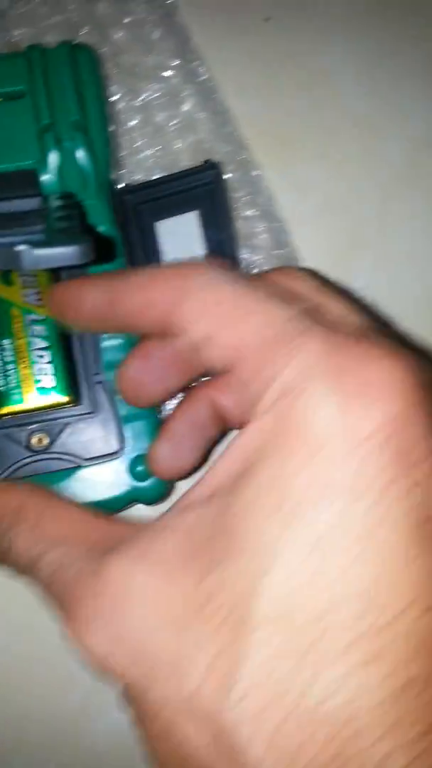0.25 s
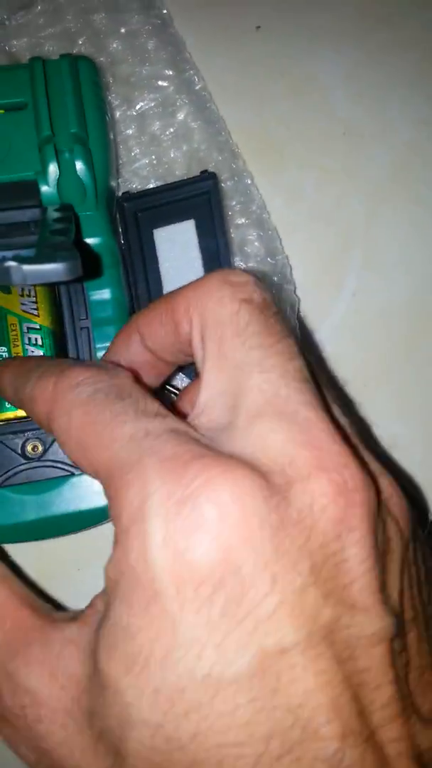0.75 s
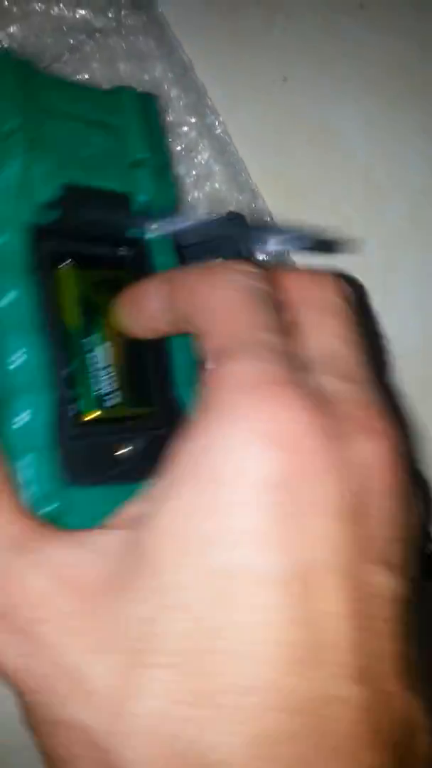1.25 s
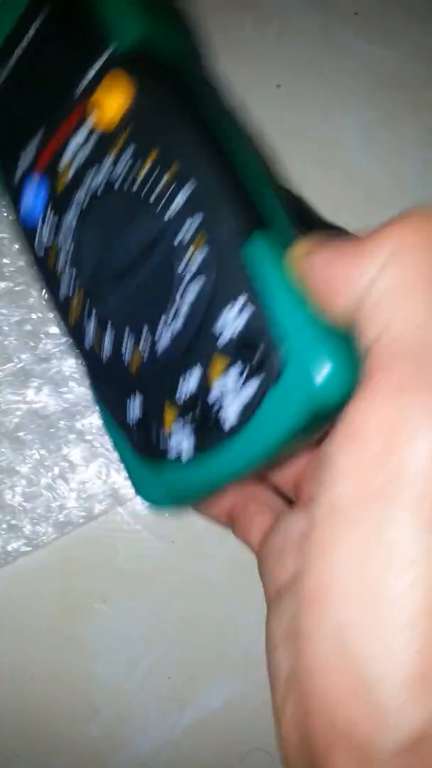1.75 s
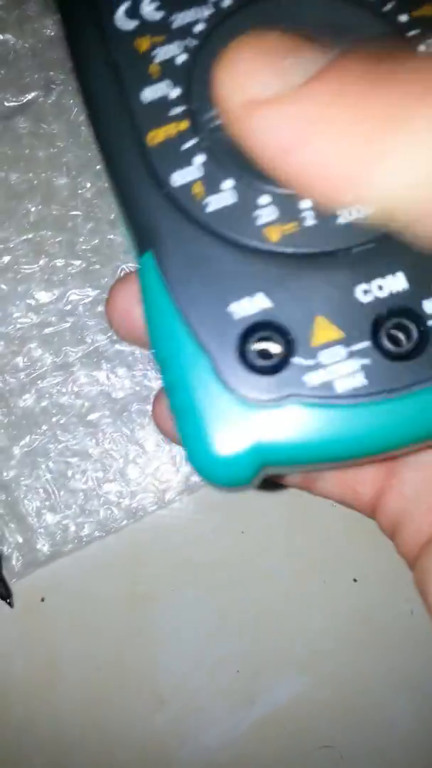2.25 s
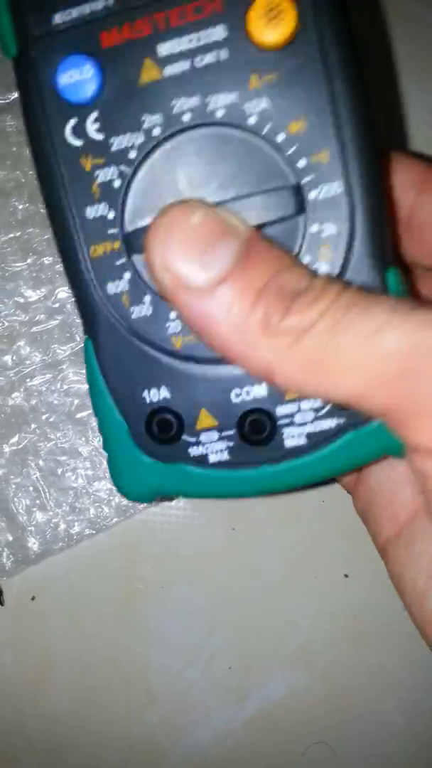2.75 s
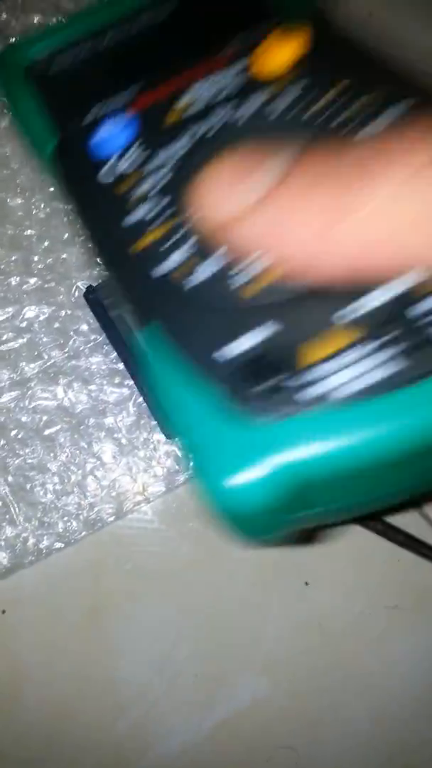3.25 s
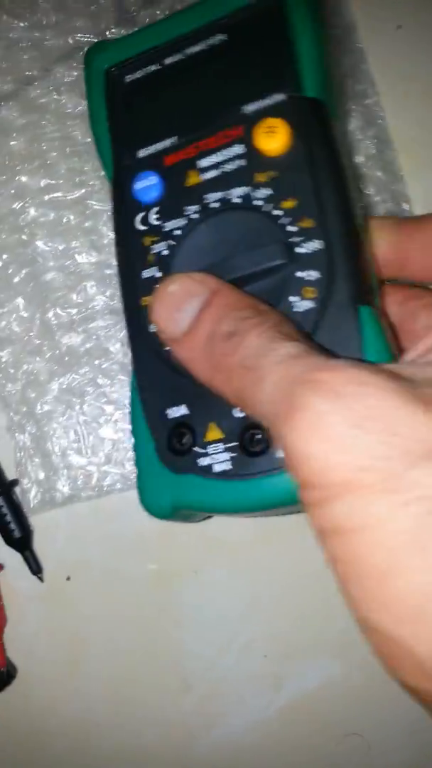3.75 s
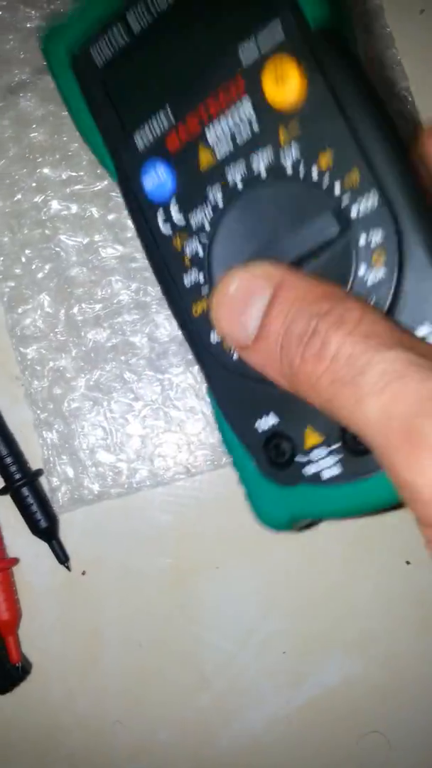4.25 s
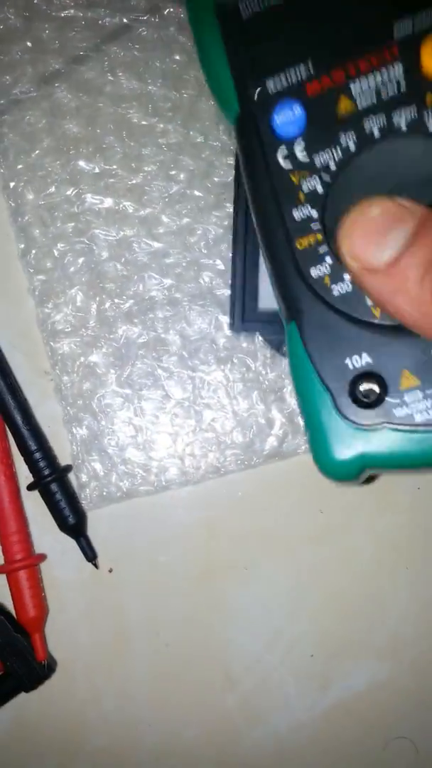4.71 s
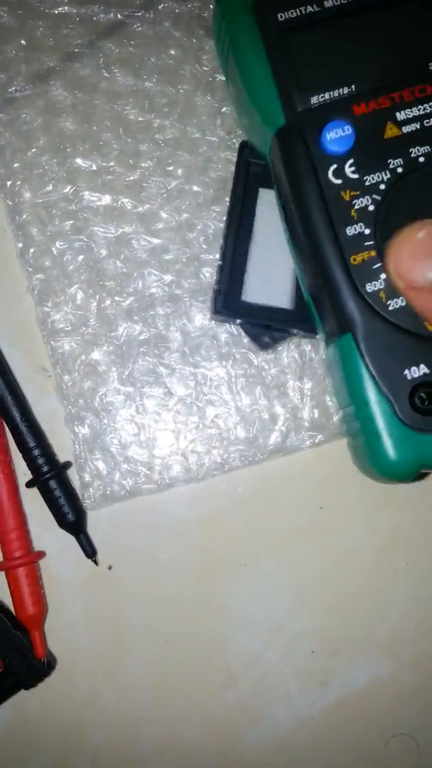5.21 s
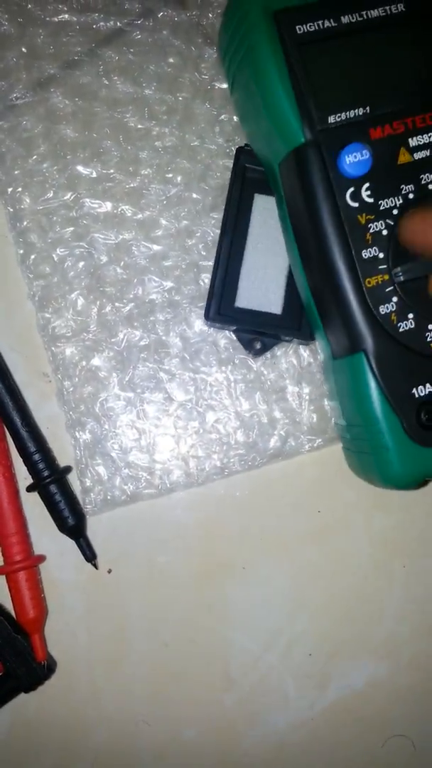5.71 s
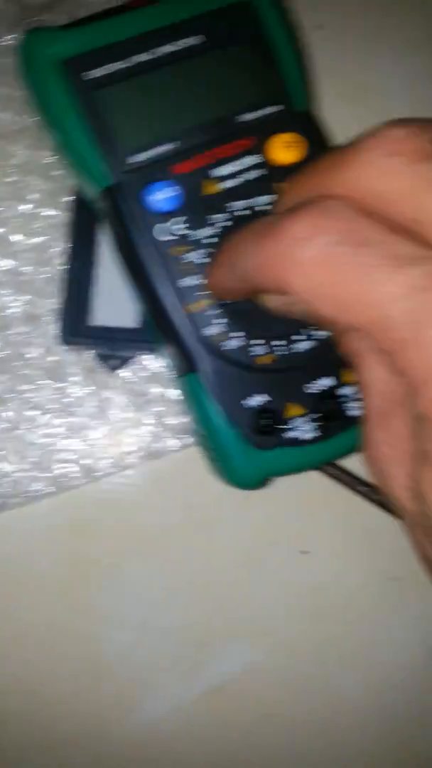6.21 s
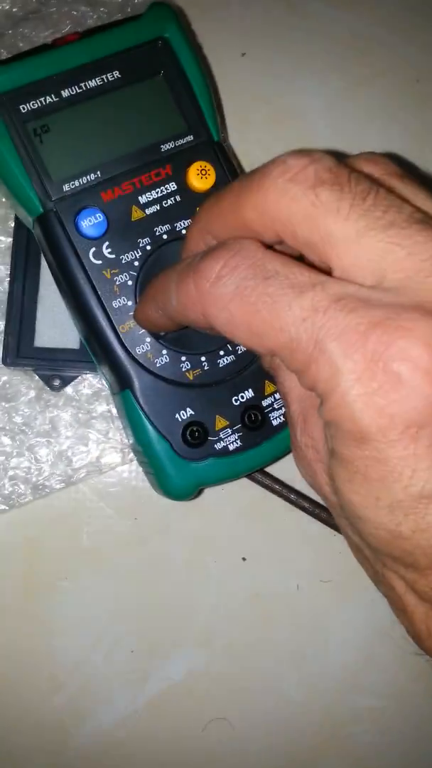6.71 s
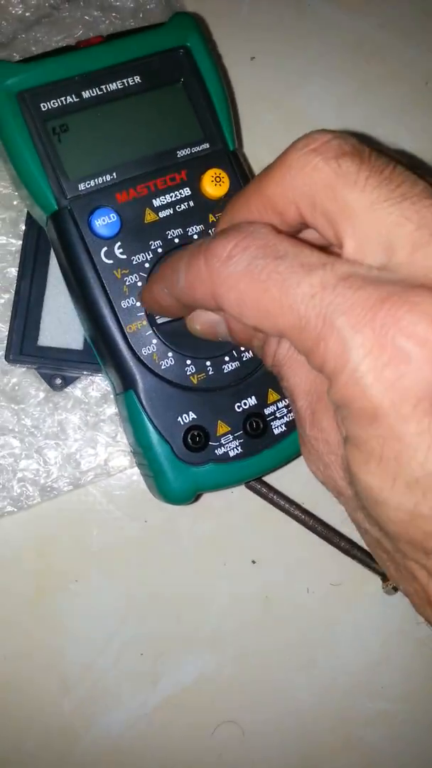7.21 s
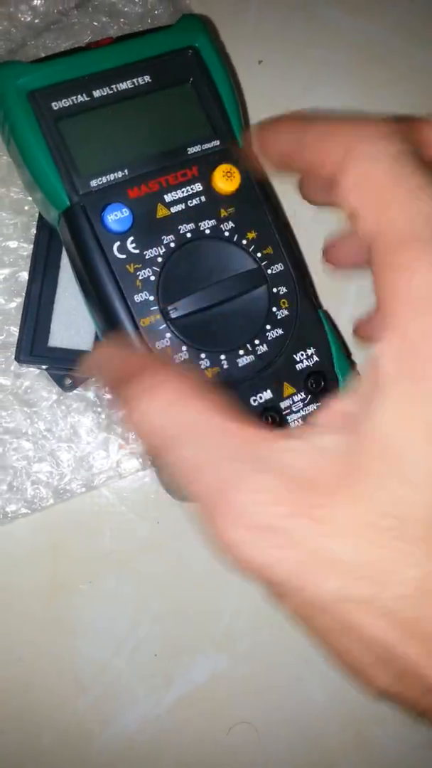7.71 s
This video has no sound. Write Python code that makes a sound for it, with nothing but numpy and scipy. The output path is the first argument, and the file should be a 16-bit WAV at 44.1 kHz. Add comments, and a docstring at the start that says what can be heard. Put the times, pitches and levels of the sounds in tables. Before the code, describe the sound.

Hands fumble a hollow plastic meter over crinkling bubble wrap, with scattered knocks and a dense clatter, then two hard dial clacks, close up indoors.

```python
"""Hands fit a battery into a plastic meter, turn it over on bubble wrap, then click its dial, close to a phone.
First come scattered knocks over film rustle, then a thick run of them: walls crack, the hollow case thuds,
the loose stand rings. As the knocks thin out, creases pop in the film; near the end the dial clacks twice,
each a hard crack with a smooth spray behind it, between the last rustles. Fingers and film are noise in
clumps of tiny snaps; a small hard room answers all but the dial, over hiss that a gate pulls down."""
import sys
import numpy as np
from scipy import signal
from scipy.fft import rfft, irfft, next_fast_len
from scipy.io import wavfile
from scipy.ndimage import uniform_filter1d

SR = 44100
rng = np.random.default_rng(int(sys.argv[2]) if len(sys.argv) > 2 else 0)


def store_wav(level_fs):
    """Save 16-bit WAV to argv[1]."""
    pcm = np.round(np.clip(np.atleast_2d(level_fs), -1, 1) * 32767)
    wavfile.write(sys.argv[1], SR, pcm.T.astype(np.int16))


N = 351036

# Background hiss spectrum: [f/Hz, relative level/dB per Hz]
HISS_SPECTRUM = [(33, -4), (277, -3.5), (1290, -9), (14300, -13.5), (16000, -37.5)]
HISS_DB = -58
# Colour difference of the two microphone ports, shared out between them: [f/Hz, left minus right level/dB]
PORT_COLOUR = [(120, 4.5), (240, -0.5), (480, -0.5), (950, -3), (1890, 4.5), (3770, 8), (7520, -17),
               (15000, 0)]
# Lag of the left port: [f/Hz, lag/s]
LEFT_PORT_LAG = [(1450, 0.00025), (1900, 0.0004917)]
# Room decay: [f/Hz, t60/s]
ROOM_DECAY = [(1500, 0.28), (6000, 0.19), (14000, 0.3)]
EDGE_HZ = 16100  # top of the recorded band

# Resting contact with the film: [t/s, rustle level/dB]
RESTING_CONTACT = [(0.0, -58), (0.4, -70), (0.92, -87), (1.0, -58.5), (2.05, -51), (2.15, -88),
                   (3.6, -70.5), (4.3, -53), (4.5, -108), (4.65, -46), (5.1, -48.5), (5.65, -54.5),
                   (5.85, -57.5), (6.33, -54.5), (6.6, -67.5), (7.0, -67), (7.96, -63)]
# Strokes of hand and case over the film: [t/s of full pressure, rustle level/dB, hold/s]
FILM_STROKES = [(0.957, -52.5, 0.12), (1.195, -47, 0.028), (1.374, -46, 0.0083), (1.493, -43.5, 0.0099),
                (1.619, -34, 0.052), (1.913, -40, 0.01), (2.896, -50, 0.018), (3.674, -41, 0.12),
                (3.914, -42.5, 0.035), (4.203, -43, 0.048), (5.066, -38, 0.0072), (5.515, -38.5, 0.0081),
                (7.663, -43.5, 0.0062), (7.897, -47.5, 0.077)]
PRESS_DB_PER_S, LIFT_DB_PER_S = 327.5, 224
# A knock or pop shakes the film, which then settles; SHAKE_DB is relative to the blow
SHAKE_DB, SETTLE_DB_PER_S, SHAKE_RISE_S = -19, 196, 0.0013
# Film rustle spectrum: [f/Hz, relative level/dB per Hz]
FILM_SPECTRUM = [(530, -64.5), (900, -5), (1750, 9), (2330, 3.5), (3000, 4.5), (6560, 2), (12900, -13.5),
                 (14400, -20), (16000, -60.5)]
# Single creases popping in the film: [t/s, peak level/dB, pitch f/Hz]
CREASE_POPS = [(0.0489, -35.5, 7390), (0.199, -40.5, 5500), (0.5797, -38.5, 4900), (0.769, -37.5, 4270),
               (1.1747, -30.5, 5600), (1.23, -34, 6100), (1.393, -28.5, 5400), (1.686, -18, 5960),
               (1.9366, -25, 5200), (2.065, -33, 2370), (2.17, -35, 5130), (2.4996, -46.5, 4000),
               (2.799, -33.5, 2010), (2.819, -32, 5300), (3.053, -35, 3460), (3.326, -39.5, 3000),
               (4.081, -27, 3000), (4.162, -32, 5230), (4.283, -30, 3700), (4.5425, -40.5, 2340),
               (4.751, -18.5, 5500), (5.394, -26.5, 3000), (5.541, -23.5, 5360), (5.7025, -27, 3680),
               (5.816, -21.5, 4700), (5.901, -29, 4900), (5.9819, -28, 3550), (6.0056, -33, 3980),
               (6.0431, -26.5, 4100), (6.058, -35, 4000), (6.0992, -32, 5760), (6.1732, -27.5, 5030),
               (6.2108, -32, 3080), (6.287, -29, 4700), (6.306, -31.5, 6600), (6.36, -40, 7500),
               (6.4128, -34.5, 2050), (6.44, -26, 3800), (6.6645, -36.5, 6600), (6.927, -37, 6500),
               (7.015, -39, 6300), (7.085, -29.5, 5800), (7.456, -37.5, 3100), (7.693, -32, 3830),
               (7.866, -35.5, 2500)]
POP_T60_S, POP_SPREAD = 0.0062, 1.454  # spread: ratio of each band edge to the pitch

# Dial detent clacks: [t/s, level/dB, treble level/dB above it]
DIAL_CLACKS = [(6.449, -9.5, -8), (7.2848, -5, -17.5)]

# Modes of the air in the case, before extra damping: [f/Hz, level/dB, t60/s]
HOLLOW_MODES = [(542.6, -2.5, 0.23), (649.6, 1.5, 0.075)]
# Modes of the loose stand when free to ring: [f/Hz, level/dB, t60/s]
STAND_MODES = [(1345, 0, .08), (1771, 0, .13), (2207, -1, .07), (2420, -3, .05), (3760, 0, .04)]
# How freely case and stand ring: [t/s, freedom 0-1]
FREEDOM = [(1.5, .05), (1.58, .9), (2.05, .5), (2.1, .05), (2.6, .05), (2.66, .7), (3.9, .6), (3.98, .95),
           (4.35, .95), (4.6, .7), (5.6, .65), (5.7, .05)]
OVERTONE = 2.8  # a struck bar also rings at this multiple of its pitch
# Knocks and snaps: [t/s, wall level/dB, hollow thud trim/dB and bright snap trim/dB over the wall, wall f/Hz]
BLOWS = [(0.075, -35.5, -19, 10.5, 3420), (0.4756, -29.5, 3.5, 1, 3100), (0.968, -45.5, 0.5, 9, 1200),
         (1.0759, -34, -13.5, -10, 3330), (1.5865, -26, -13.5, -19, 3840), (2.281, -39, -5.5, 0.5, 3900),
         (2.578, -40.5, -4, 2, 2930), (2.6677, -24.5, -18, -17.5, 2300), (2.7452, -29, -17, -27.5, 2400),
         (2.901, -35, -9, -28, 1370), (2.9349, -21, -25, -3, 1980), (2.9495, -24.5, -23.5, -7, 1800),
         (3.3921, -19.5, -17, 1, 2250), (3.409, -17.5, -12, -2.5, 2180), (3.4421, -15.5, -22, -8.5, 2600),
         (3.5228, -23.5, -15, -13.5, 2400), (3.743, -30.5, -17.5, -32, 3830), (3.8338, -34, -6.5, -8, 2420),
         (3.9928, -32, -16, -28, 1350), (4.0602, -32, -11, -16, 2700), (4.086, -40.5, -1.5, -4, 2430),
         (4.2228, -36, -7, -27, 1330), (4.301, -22, -14.5, -15, 1870), (4.4031, -42.5, -16.5, 10, 3380),
         (4.631, -19, -45.5, -6, 1900), (4.672, -15, -48, -5, 2020), (4.681, -17, -45, -1, 2140),
         (4.6918, -40, -11.5, 22, 2660), (4.7281, -19.5, -41, -0.5, 2300), (4.732, -25.5, -45.5, 2.5, 3900),
         (4.779, -31, -6.5, -16.5, 2270), (4.803, -17, -16, -6, 3410), (4.8112, -21.5, -2.5, -0.5, 3900),
         (5.142, -39.5, 8.5, 5, 2180), (5.233, -21, -24, -12.5, 1800), (5.246, -23, -19, -5, 2100),
         (5.27, -24, -11.5, -13, 1350), (5.295, -22, -12, -6, 2400), (5.3724, -24, -14, -16.5, 2070),
         (5.4145, -27.5, -8.5, -7.5, 3570), (5.448, -33, -1.5, 1, 2600), (5.5039, -33, -3, -4, 4080),
         (5.6148, -47, 5, -4, 1360), (6.823, -41.5, -3.5, -10, 1956), (7.2146, -30, -22.5, -9, 2420),
         (7.27, -45, 1.5, -20.5, 2280)]


def gain_of(db):
    """Turns decibels into an amplitude factor."""
    return 10 ** (np.asarray(db) / 20)


def evened(x):
    """Brings a signal to an RMS of 1."""
    return x / np.sqrt(np.mean(x ** 2) + 1e-20)


def read(points, hz):
    """Reads a frequency curve, straight between its points on a log scale."""
    f, value = np.transpose(points)
    return np.interp(np.log(hz + 1), np.log(f + 1), value)


def bandpassed(x, lo_hz, hi_hz):
    """Keeps one band of a signal, with gentle slopes."""
    return signal.sosfilt(signal.butter(2, [lo_hz, hi_hz], "bandpass", fs=SR, output="sos"), x)


def coloured(x, points, share=1, lag=((1, 0),)):
    """Filters by a share of a dB spectrum, with an optional delay for each frequency."""
    size = next_fast_len(N + 4096)
    hz = np.fft.rfftfreq(size, 1 / SR)
    turn = np.exp(-2j * np.pi * hz * read(lag, hz))
    return irfft(rfft(x, size) * gain_of(share * read(points, hz)) * turn, size)[..., :N]


def seeds_for(events):
    """Draws one seed per event, so each has its own chance variation."""
    return rng.integers(0, 2 ** 31, (len(events), 1))


def ring(modes, t, luck, detune):
    """Damped modes of one blow, each with chance strength and a little chance in pitch; peak 1."""
    hz, db, t60 = np.transpose(modes)[:, :, None]
    strength, pitch = luck.standard_normal((2, len(modes), 1))
    decay = gain_of(db + 3 * strength - 60 * t / t60)
    tones = decay * np.sin(2 * np.pi * hz * (1 + detune * pitch) * t)
    mix = tones.sum(0)
    return mix / abs(mix).max()


def crack(lo_hz, hi_hz, t60, t, luck):
    """Too many damped modes to count: a click and short burst in one band, with one weaker bounce; peak 1."""
    bounce = t - luck.uniform(.0015, .004)
    shape = gain_of(-60 * t / t60)
    shape = shape + luck.uniform(0, 0.6) * gain_of(-60 * abs(bounce) / t60) * (bounce > 0)
    click = 4 * (t == 0)
    burst = bandpassed(luck.standard_normal(len(t)) * shape + click, lo_hz, hi_hz)
    return burst / abs(burst).max()


def room(x):
    """Sparse reflections of random sign, each band dying at its own speed, other taps at each port."""
    taps = np.zeros((2, SR // 2))
    # one tap at a chance spot in every 20 samples
    at = np.arange(120, SR // 2 - 20, 20) + rng.integers(0, 20, (2, (SR // 2 - 121) // 20))
    np.put_along_axis(taps, at, rng.choice([-1., 1.], at.shape), 1)
    hz, t, bands = signal.stft(taps, SR, nperseg=256)
    decay = gain_of(-60 * t / read(ROOM_DECAY, hz)[:, None])
    tail = signal.istft(bands * decay, SR, nperseg=256)[1]
    # thuds stay in hand and table
    x = signal.sosfilt(signal.butter(2, 900, "highpass", fs=SR, output="sos"), x)
    return signal.fftconvolve(x[None], tail / np.linalg.norm(tail[0]), axes=1)[:, :N]


def rustle_level(t):
    """Power sum of resting contact, strokes that press, hold and lift, and the shake after each knock or pop."""
    power = gain_of(np.interp(t, *np.transpose(RESTING_CONTACT))) ** 2
    for s, db, hold in FILM_STROKES:
        press = PRESS_DB_PER_S * np.maximum(s - t, 0)
        lift = LIFT_DB_PER_S * np.maximum(t - s - hold, 0)
        power += gain_of(db - press - lift) ** 2
    for s, blow_db, *_ in BLOWS + CREASE_POPS:
        since = np.maximum(t - s, 0)
        rise = np.minimum(since / SHAKE_RISE_S, 1)
        power += (rise * gain_of(blow_db + SHAKE_DB - SETTLE_DB_PER_S * since)) ** 2
    return np.sqrt(power)


def drift(size):
    """Smooth random wander of RMS 1, slower for a larger size in samples."""
    return evened(uniform_filter1d(uniform_filter1d(rng.standard_normal(N), size), size))


def film_creases():
    """Creasing film: tiny snaps of scattered pitch in clumps over a steady rub, at two ports."""
    creases = rng.standard_normal((2, N))
    # lower edge Hz, upper edge Hz, level dB
    for lo_hz, hi_hz, db in [(2196, 2890, -7.5), (3000, 5200, -6.5), (4530, 6730, -0.5), (8200, 21500, 4.0)]:
        strength = gain_of(3.8 * np.minimum(rng.exponential(1, N), 2.2))
        ticks = rng.standard_normal(N) * strength * (rng.random(N) < 1100 / SR)  # about 1100 a second
        # creases favour one port or the other, and each size swells alone
        ticks = ticks * gain_of(2.5 * rng.standard_normal((2, N)) + 3.5 * drift(size=1200))
        creases += gain_of(db) * evened(bandpassed(ticks, lo_hz, hi_hz))
    return creases * gain_of(3.5 * drift(size=200))


def handling():
    """Rubbing rustles the film and drums the hollow and stand of the held case."""
    t = np.arange(N) / SR
    creases = film_creases()
    film = evened(coloured(creases, FILM_SPECTRUM))
    short = t[:3000]
    body = sum(gain_of(db - 130 * short / t60) * np.sin(2 * np.pi * hz * short)
               for hz, db, t60 in HOLLOW_MODES + STAND_MODES)
    drummed = evened(signal.oaconvolve(creases[1], body)[:N])
    # fingertips bump the case in small knocks
    bumps = bandpassed(rng.standard_normal(N), 90, 1300) * gain_of(5 * drift(size=400))
    case = np.interp(t, *np.transpose(FREEDOM)) * drummed + 0.33 * evened(bumps)
    slow = t[::44]  # the level moves slowly enough for about a thousand points a second
    return np.interp(t, slow, rustle_level(slow)) * (0.6 * film + 0.24 * case)


def pops():
    """Each loud crease is one dry crack around its own pitch."""
    out, t = np.zeros(N + SR), np.arange(1500) / SR
    for (s, db, hz), seed in zip(CREASE_POPS, seeds_for(CREASE_POPS)):
        luck, at = np.random.default_rng(seed), round(s * SR)
        pop = crack(hz / POP_SPREAD, min(hz * POP_SPREAD, 15000), POP_T60_S, t, luck)
        out[at:at + len(t)] += gain_of(db) * pop
    return out[:N]


def dial():
    """The detent drops home: a hard wide crack over a short thud, then a smooth spray from table and walls."""
    out, t = np.zeros((2, N)), np.arange(20000) / SR
    for (s, db, treble_db), seed in zip(DIAL_CLACKS, seeds_for(DIAL_CLACKS)):
        luck, at = np.random.default_rng(seed), round(s * SR)
        clack = crack(2600, 8200, 0.0099, t, luck)
        clack = clack + 0.13 * crack(350, 2000, 0.059, t, luck)
        clack = clack + gain_of(treble_db) * crack(7000, 14000, 0.022, t, luck)
        spray = [crack(1900, 8000, 0.31, t, luck) for port in out]
        out[:, at:at + len(t)] += gain_of(db) * (clack + 0.27 * np.array(spray))
    return out


def hollow_thud(t, luck, loose):
    """Air in the case swells up and booms, dying faster when the case is held; a low crack lies over it."""
    damping = gain_of(-700 * (2 - loose) * t)
    swell = 1 - np.exp(-t / 0.0032)
    boom = ring(HOLLOW_MODES, t, luck, .07) * damping * swell
    return 2.5 * boom + 0.9 * crack(380, 1100, 0.053, t, luck)


def wall_and_stand(t, luck, loose, wall_hz):
    """The wall cracks at its pitch; a freer stand rings more and longer near that pitch and its overtone."""
    stand = []
    for hz, db, t60 in STAND_MODES:
        octaves_off = abs(np.log2(hz / wall_hz / np.array([1, OVERTONE]))).min()
        stand.append((hz, db - 16 * octaves_off, loose * t60))
    ringing = 1.274 * loose * ring(stand, t, luck, 0.018)
    wall = crack(0.77 * wall_hz, 1.224 * wall_hz, 0.016 + 0.065 * loose, t, luck)
    return ringing + (1.1 - loose) * wall


def bright_snap(t, luck, loose):
    """Latches snap in a bright band, longer when the case is free, with a faint airy top."""
    return 2.15 * crack(4230, 7170, 0.0082 + 0.026 * loose, t, luck) + 0.15 * crack(10160, 13000, 0.048, t, luck)


def knocks():
    """Each blow cracks walls and latches, thuds in the hollow and rings the stand; laid down, all is damped."""
    out, t = np.zeros((2, N + SR)), np.arange(5000) / SR
    for (s, wall_db, thud_db, snap_db, wall_hz), seed in zip(BLOWS, seeds_for(BLOWS)):
        luck = np.random.default_rng(seed)
        loose = np.clip(np.interp(s, *np.transpose(FREEDOM)), 0, 1)
        thud = hollow_thud(t, luck, loose)
        wall = wall_and_stand(t, luck, loose, wall_hz)
        snap = bright_snap(t, luck, loose)
        blow = gain_of(wall_db) * (wall + gain_of(thud_db) * thud + gain_of(snap_db) * snap)
        # each spot has its own path to the left port
        for port, sooner in enumerate([luck.integers(0, 7), 0]):
            at = round(s * SR) - sooner
            out[port, at:at + len(t)] += blow
    return out[:, :N]


def scene():
    """Near sound, room and dial reach two ports of different colour, the left one later."""
    near = knocks() + handling() + pops()
    air = near + gain_of(-6.5) * room(near[1]) + dial()
    left = coloured(air[0], PORT_COLOUR, 0.73, LEFT_PORT_LAG)
    right = coloured(air[1], PORT_COLOUR, -0.42)
    return gain_of(4.5) * np.array([left, right])


def record(dry):
    """Overload ceiling, bass cut and hiss; a gate turns quiet moments down, opening at once; band limit."""
    wired = signal.sosfilt(signal.butter(2, 130, "highpass", fs=SR, output="sos"), np.clip(dry, -1, 1))
    wired = wired + gain_of(HISS_DB) * evened(coloured(rng.standard_normal((2, N)), HISS_SPECTRUM))
    power_db = 10 * np.log10(abs(uniform_filter1d((wired ** 2).mean(0), 300)) + 1e-12)
    fall = np.arange(N) * 500.0 / SR  # closing speed, dB a second
    held_db = np.maximum.accumulate(power_db + fall) - fall
    gate_db = np.clip(2.23 * (held_db + 51.0), -14, 0)  # closes below -51 dB, by 14 dB at most
    gated = wired * gain_of(uniform_filter1d(gate_db, 200))
    edge = signal.firwin(511, EDGE_HZ, window=("kaiser", 9), fs=SR)
    return signal.oaconvolve(gated, edge[None], "same")


dry = scene()
out = record(dry)
store_wav(out)
```